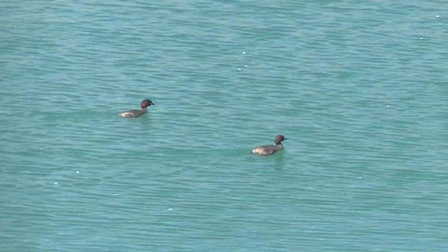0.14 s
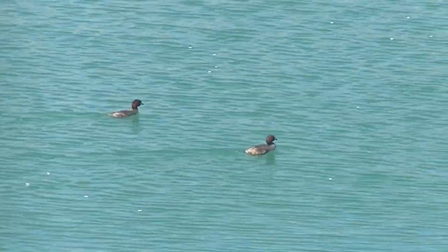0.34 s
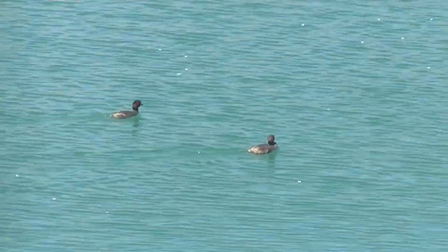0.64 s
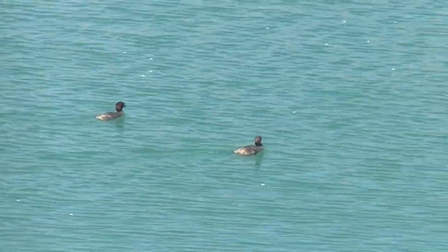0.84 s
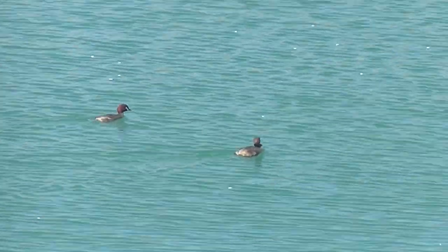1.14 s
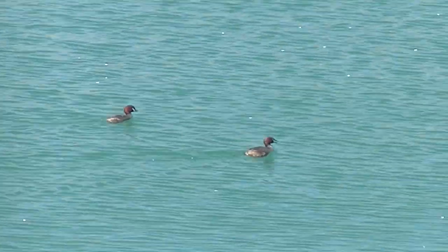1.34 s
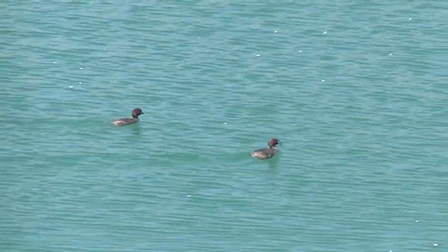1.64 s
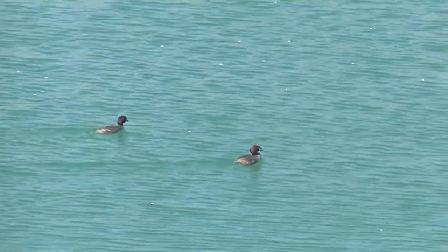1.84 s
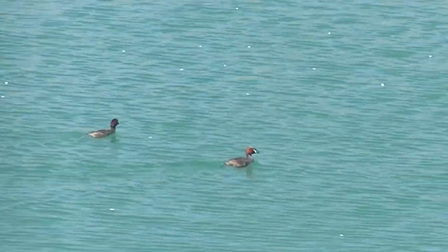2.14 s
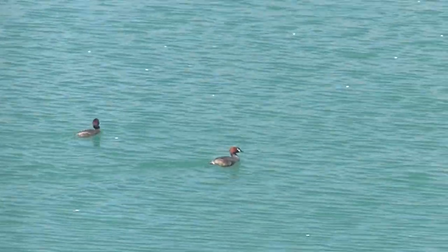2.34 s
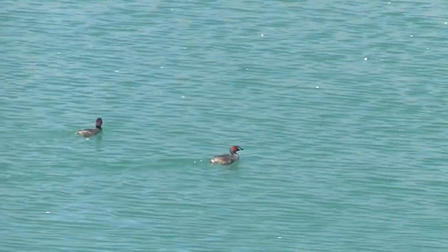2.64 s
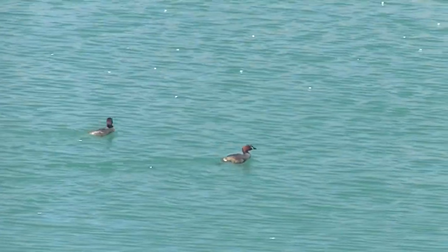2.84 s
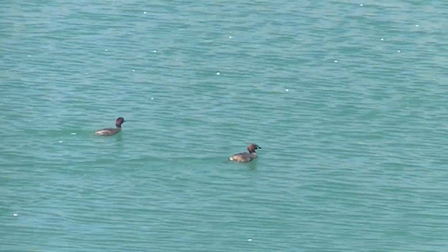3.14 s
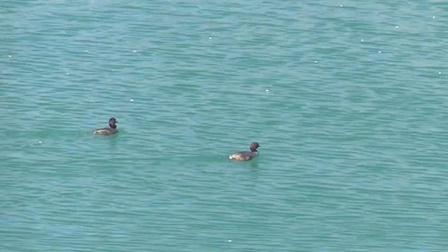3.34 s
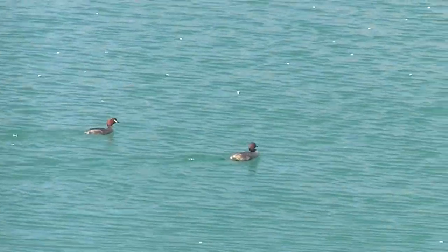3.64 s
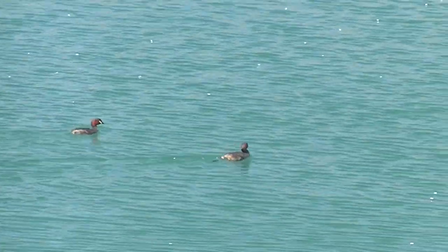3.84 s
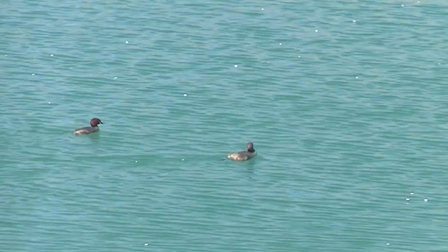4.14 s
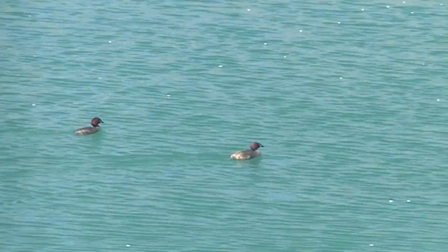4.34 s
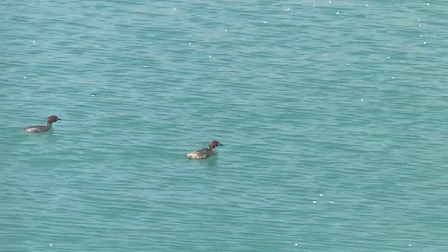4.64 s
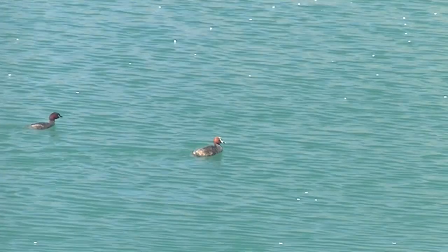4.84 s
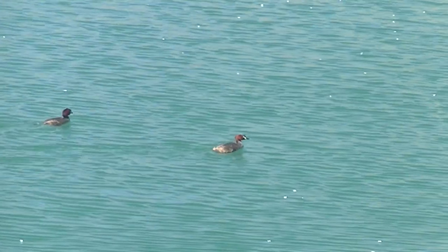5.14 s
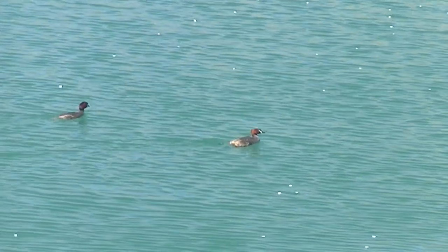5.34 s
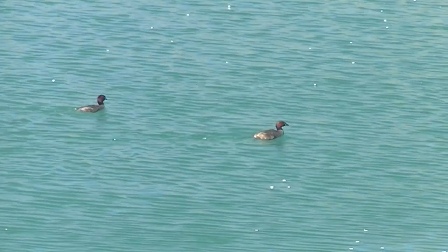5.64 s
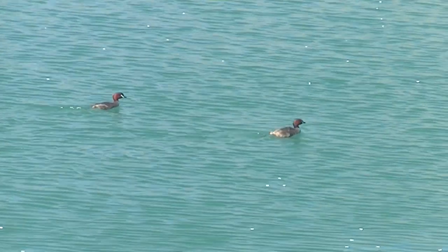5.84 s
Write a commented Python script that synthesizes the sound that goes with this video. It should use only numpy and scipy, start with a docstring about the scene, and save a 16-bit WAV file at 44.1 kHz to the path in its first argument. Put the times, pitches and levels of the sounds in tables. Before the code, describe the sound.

A soft, steady outdoor hush with a fine hiss lasts the whole six seconds, fairly even and slightly wide. Very faint bumps may be heard near 0.3 s. At about 0.65 s a tiny peep leads into a rapid, high whinnying trill by little grebes on the water. Short arched, reedy notes alternate with purer rising ones, each kind about fifteen times a second, making a bubbling chatter around 2.5 to 4 kHz. It swells by 1 s, stays strong to about 2 s, slows slightly and fades with soft peeps by 2.5 s, trailing a faint wash from the banks. Then mostly hiss: faint distant chirps around 3.8 s, weak bumps near the microphone around 4.3 to 4.4 s, one crisp small tap at 4.5 s, a barely audible chirp at 4.9 s, and another thin double chirp near 5.7 s.

```python
"""Little grebes trilling on a pond

Arched and rising notes of about 25 ms alternate, each kind about 15 times a second, with soft peeps around.
Each note is a harmonic whistle carried by partials 2 and 3; water smears it and the banks return a faint wash.
Around it: steady hush and hiss (shaped noise), distant chirps (gliding sines), small knocks (decaying modes)."""
import sys
import numpy as np
from scipy import signal
from scipy.fft import rfft, irfft, next_fast_len
from scipy.io import wavfile
from scipy.ndimage import map_coordinates

SR = 44100
rng = np.random.default_rng(int(sys.argv[2]) if len(sys.argv) > 2 else 0)


def transcribe(signal):
    """Save signal, clipped to [-1, 1], as a 16-bit WAV file at the path in sys.argv[1]."""
    frames = np.atleast_2d(signal).T
    limited = np.clip(frames, -1, 1)
    pcm = np.round(limited * 32767).astype(np.int16)
    wavfile.write(sys.argv[1], SR, pcm)


N = 265041


def amp(db):
    """Decibels to gain."""
    return 10 ** (np.asarray(db) / 20)


def unit(x):
    """Scaled to rms 1."""
    return x / np.sqrt(np.mean(x ** 2) + 1e-20)


def along(points, hz):
    """(Hz, value) points interpolated on a log-frequency axis."""
    f, v = np.transpose(points)
    return np.interp(np.log(hz + 1), np.log(f + 1), v)


def wobble(rate_hz, size):
    """Smooth random curve with rate_hz knots a second."""
    knots = rng.standard_normal(4096)
    return map_coordinates(knots, [np.arange(size) * rate_hz / SR], mode="wrap")


def filtered(x, response):
    """x times a response of frequency."""
    m = next_fast_len(N + SR // 2)
    return irfft(rfft(x, m) * response(np.fft.rfftfreq(m, 1 / SR)), m)[..., :N]


def noise(spectrum):
    """Coloured noise of rms 1."""
    return unit(filtered(rng.standard_normal(N), lambda hz: amp(along(spectrum, hz))))


def add(track, start_s, sound):
    """Mix a sound into the track at start_s."""
    part = track[round(start_s * SR):][:len(sound)]
    part += sound[:len(part)]


def swell(u, attack, release):
    """Smooth rise and fall over u = 0 to 1; attack and release are shares of it."""
    rise = np.sin(np.pi / 2 * np.clip(u / attack, 0, 1)) ** 2
    fall = np.sin(np.pi / 2 * np.clip((1 - u) / release, 0, 1)) ** 2
    return rise * fall


# slow course of each voice: t/s, f/Hz, length/s, partial 2 level/dB before voice gain, partial 3 re 2/dB
ARCHED_COURSE = [(0.736, 1046, 0.018, -55.5, 1.5), (0.871, 1242, 0.022, -46.5, 1),
                 (0.995, 1290, .028, -41.5, -4.5), (1.122, 1242, 0.028, -41, 0),
                 (1.26, 1280, 0.029, -43, 3), (1.385, 1346, 0.024, -43.5, 10.5),
                 (1.458, 1234, 0.021, -46, 8), (1.651, 1208, .024, -46, 6), (1.72, 1245, .025, -40.5, -7.5),
                 (1.989, 1198, 0.02, -44, 1), (2.13, 1073, 0.017, -56, 3), (2.254, 1350, .017, -55, 0)]
RISING_COURSE = [(.76, 1307, .021, -54, -6), (.83, 1334, 0.022, -47.5, 3), (1.05, 1472, 0.031, -39, -4),
                 (1.25, 1556, 0.025, -41, -5.5), (1.41, 1555, 0.03, -38.5, -7.5),
                 (1.601, 1441, 0.028, -36.5, -13), (1.885, 1453, .021, -36.5, -14.5),
                 (2.017, 1420, 0.019, -34, -20), (2.087, 1323, 0.026, -43.5, -5),
                 (2.3, 1248, .023, -43.5, -6.5), (2.38, 1138, 0.02, -52.5, -2.5)]
# rising notes: t/s, pitch change/share of pitch, accent (0-1; above 0.5 = louder late)
RISING_SHAPE_COURSE = [(.8, .06, 0.53), (1.0, 0.041, .36), (1.45, 0.066, 0.29), (2.0, 0.034, 0.6),
                       (2.3, -0.011, 0.46)]
# soft upward peeps before and after the trill: t/s, partial 2 level/dB before voice gain
PEEP_EVENTS = [(.652, -56.5), (2.44, -56.5), (2.518, -55.5)]
PEEP_S, PEEP_HZ, PEEP_RISE, PEEP_THIRD_DB = 0.028, 1366, 0.205, -8
ARCHED_RISE, ARCHED_ACCENT = -0.022, 0.49  # pitch change/share, accent
ANSWER_SHARE = .44  # rising note's lag/period
EDGE_DB = -15.5  # lead-in and tail re body


def grebes():
    """Reedy arched notes on the beat interlock with purer rising ones between the beats."""
    on_beat, off_beat = beats(0, count=24), beats(ANSWER_SHARE, count=25)
    arched_notes = phrase(on_beat, ARCHED_COURSE, ARCHED_RISE, ARCHED_ACCENT)
    shape_s, rise, accent = np.transpose(RISING_SHAPE_COURSE)
    rise_now, accent_now = np.interp(off_beat, shape_s, rise), np.interp(off_beat, shape_s, accent)
    rising_notes = phrase(off_beat, RISING_COURSE, rise_now, accent_now)
    peeps = [(s, PEEP_S, PEEP_HZ, PEEP_RISE, .5, db, db + PEEP_THIRD_DB) for s, db in PEEP_EVENTS]
    arched = notes(arched_notes, arch=0.222, scoop=0.1555, sag=0.164, attack=0.29, release=0.37,
                   edge_db=EDGE_DB, jitter=0.0048, flutter_db=0.7,
                   first_db=-16, fourth_db=-12.0, fifth_db=-16, upper_db=-40)
    rising = notes(rising_notes + peeps, arch=0.156, scoop=0.1473, sag=0.012, attack=0.21, release=0.45,
                   edge_db=EDGE_DB, jitter=0.0042, flutter_db=1.0,
                   first_db=-24.5, fourth_db=-26.0, fifth_db=-26, upper_db=-44)
    voices = amp(-0.75) * arched + amp(0.4) * rising
    return voices + ripples(voices, db=-16, t60_s=.05)


FIRST_NOTE_S = .731  # centre of the first arched note
# shortest period, beat index that has it, period growth per squared beat before and after
PERIOD_S, FASTEST_BEAT, HURRY_S, TIRE_S = .065, 10.52, 2.94e-5, 5.33e-5


def beats(share, count):
    """Times at a share of each period: the trill hurries a little, then slows as the bird tires."""
    k = np.arange(count) - FASTEST_BEAT
    period_s = PERIOD_S + np.where(k < 0, HURRY_S, TIRE_S) * k ** 2
    return FIRST_NOTE_S + np.cumsum(period_s) - (1 - share) * period_s


PITCH_SPREAD, RISE_SPREAD = .006, .025  # standard deviation from note to note, shares of pitch


def phrase(times, course, rise, accent):
    """A note centred on each time, with the pitch, length and strength that the voice has then."""
    s, *controls = np.transpose(course)
    hz, length, db, third_db = (np.interp(times, s, c) for c in controls)
    detune, bend = (rng.standard_normal((len(times), 2)) * [PITCH_SPREAD, RISE_SPREAD]).T
    start_s = times - length / 2
    return list(np.broadcast(start_s, length, hz * (1 + detune), rise + bend, accent, db, db + third_db))


# roughness of the voices: t/s, rasp re mean of partials 2 and 3/dB
RASP_COURSE = [(.7, -9), (1.0, -11), (1.2, -7), (1.4, -4), (1.55, -7), (1.8, -8), (2.1, -8), (2.5, -4)]


def notes(table, arch, scoop, sag, attack, release, edge_db, jitter, flutter_db,
          first_db, fourth_db, fifth_db, upper_db):
    """One puff of air per note: the pitch scoops up, arches and sags; the weak ends are unsteady."""
    out = np.zeros(N)
    rasp_s, rasp_db = np.transpose(RASP_COURSE)
    margin = .2  # lead-in and tail, share of length
    for s, length, hz, rise, accent, second_db, third_db in table:
        size = int((1 + 2 * margin) * length * SR)
        u = np.linspace(-margin, 1 + margin, size)
        sounding = swell(np.linspace(0, 1, size), 0.12, 0.11)
        core = swell(u, attack, release)
        # the membrane already sounds faintly just before and after the puff
        tilt = np.exp(9 * (accent - .5) * np.clip(u - .5, -.3, .3))
        pressure = unit((core + amp(edge_db) * sounding) * tilt)

        glide = rise * (u - .5) - arch * (u - .5) ** 2
        glide -= scoop / (1 + np.exp(18 * u)) + sag / (1 + np.exp(18 * (1 - u)))
        unsteady = jitter * (1 + 5 * (1 - core)) * wobble(715, size)
        pitch = hz * (1 + glide + unsteady)
        phase = 2 * np.pi * np.cumsum(pitch) / SR

        effort_db = (second_db + third_db) / 2
        partials_db = [effort_db + first_db, second_db, third_db, effort_db + fourth_db, effort_db + fifth_db]
        partials_db += [effort_db + upper_db] * 6
        tone = np.zeros(size)
        for k, db in enumerate(partials_db, 1):
            flutter = amp(flutter_db * (k - 2) * wobble(273, size))
            tone += amp(db) * unit(pressure * throat(k * pitch) * flutter * np.sin(k * phase))

        # uneven cycles: noise-modulated tone midway between partials 2 and 3
        rasp = unit(wobble(1986, size) * np.sin(5 * phase / 2))
        rasp *= swell(u, 0.03, 0.036) * (1 - 0.079 * core)
        rasp_gain = amp(effort_db + np.interp(s, rasp_s, rasp_db))
        add(out, s - margin * length, tone + rasp_gain * rasp)
    return out


# resonances of windpipe and bill: f/Hz, width/Hz, relative level/dB
THROAT_MODES = [(2380, 190, 6), (3010, 300, 10), (3880, 1200, -17), (4510, 150, 4)]


def throat(hz):
    """Gain of the windpipe and bill: a partial flares as it glides through a resonance."""
    power = sum(amp(db) ** 2 / (1 + (2 * (hz - centre) / width) ** 2) for centre, width, db in THROAT_MODES)
    return np.sqrt(power)


def ripples(x, db, t60_s):
    """The moving water scatters a short smear after each note, different from moment to moment."""
    t = np.arange(SR // 20) / SR
    out = np.zeros(N)
    for path in rng.standard_normal((3, len(t))) * amp(-60 * t / t60_s):
        out += wobble(11.0, N) * signal.fftconvolve(x, path / np.linalg.norm(path))[:N]
    return amp(db) * out / np.sqrt(3)


# decay of the wash: f/Hz, t60/s
BANK_DECAY = [(500, 0.45), (3000, 0.72), (8000, 0.34)]


def banks(x):
    """Diffuse wash from the shore, different in each channel: decaying noise, longest near 3 kHz."""
    hz, t, z = signal.stft(rng.standard_normal((2, SR // 2)), SR, nperseg=256)
    decay = amp(-60 * t / along(BANK_DECAY, hz)[:, None])
    a, b = signal.istft(z * decay, SR, nperseg=256)[1]
    tail = np.array([a + 0.54 * b, a - 0.11 * b])
    return signal.fftconvolve(x[None], tail / np.linalg.norm(tail[0]), axes=1)[:, :N]


# distant birds: t/s, length/s, start f/Hz, middle f/Hz, end f/Hz, level/dB, octave re fundamental/dB
CHIRP_EVENTS = [(3.82, 0.028, 2500, 2720, 2700, -46.5, -25), (3.835, 0.036, 3420, 3440, 3470, -48, -25),
                (3.872, 0.026, 3400, 3400, 3520, -57, -25), (4.875, .024, 2260, 2320, 2330, -56, -25),
                (5.651, 0.044, 3480, 3500, 3460, -46.5, -5), (5.681, 0.031, 3420, 3350, 3250, -47, -4.5)]


def chirps():
    """Short whistles from far away: a gliding sine and its octave, slightly unsteady."""
    out = np.zeros(N)
    for s, length, start_hz, middle_hz, end_hz, db, octave_db in CHIRP_EVENTS:
        u = np.linspace(0, 1, int(length * SR))
        pitch = np.polyval(np.polyfit([0, .5, 1], [start_hz, middle_hz, end_hz], 2), u)
        phase = 2 * np.pi * np.cumsum(pitch * (1 + 0.0063 * wobble(127, len(u)))) / SR
        level = amp(db + 2.4 * wobble(140, len(u))) * swell(u, .38, .35)
        add(out, s, level * (np.sin(phase) + amp(octave_db) * np.sin(2 * phase)))
    return out


# knocks near the microphone: t/s, relative level/dB, contact time/s
KNOCK_EVENTS = [(.28, -60, 0.0013), (.38, -61, 0.0017), (2.14, -53, 0.0014), (2.429, -55.5, 0.0017),
                (4.294, -62, 0.0019), (4.321, -61, 0.0027), (4.358, -54, 0.0024), (4.41, -55, .0014),
                (4.5332, -35.5, .0001)]
# modes of the small case that is knocked: f/Hz, relative level/dB, t60/s
CASE_MODES = [(206, -28.5, 0.065), (300, -10.5, 0.052), (496, 7, 0.017), (810, 9, 0.02),
              (1010, 12.5, 0.014), (1500, 1, 0.019)]


def knocks():
    """Soft bumps and one hard tap ring the case modes; a longer contact weakens the high modes."""
    out, t = np.zeros(N), np.arange(SR // 8) / SR
    # the small case radiates neither deep bass nor treble
    radiation = signal.butter(3, [160, 1750], "band", fs=SR, output="sos")
    for s, db, contact_s in KNOCK_EVENTS:
        ring = np.zeros(len(t))
        for hz, level_db, t60_s in CASE_MODES:
            mode = amp(level_db - 60 * t / t60_s) * np.cos(2 * np.pi * hz * t)
            ring += mode / (1 + (2 * hz * contact_s) ** 4)
        ring = signal.sosfilt(radiation, ring)
        add(out, s, amp(db + 6.0) * ring / np.abs(ring).max())
    return out


# noise spectra, breeze and hiss common to both channels, side opposed: f/Hz, relative level/dB
HUSH_SPECTRUM = [(24, -58), (40, -27.5), (97, -33), (172, -25.5), (329, -11), (541, -5), (579, -4.5),
                 (699, -3.5), (762, -1.5), (1360, -8), (1560, -5.5), (2400, -11), (3120, -20), (5280, -120)]
HISS_SPECTRUM = [(1290, -36), (2200, -8), (3270, -0.5), (4800, 0), (5450, -6), (7900, -9), (9950, -18),
                 (15200, -22), (15800, -31)]
SIDE_SPECTRUM = [(18, -47), (30, -11), (168, -11), (383, 0.5), (1040, 0.5), (1220, -1.5), (1610, -1.5),
                 (2770, -2), (4400, -9.5), (4880, -10.5), (6640, -13.5), (7360, -32), (8590, -22),
                 (9280, -30.5), (14000, -39)]
BREEZE_DB, HISS_DB, SIDE_DB = -55.5, -52.0, -60.5  # mean rms levels


def background():
    """Breeze on water and shore, its level drifting slightly, with mono microphone hiss and side noise."""
    hush = amp(BREEZE_DB + 0.16 * wobble(10, N)) * noise(HUSH_SPECTRUM)
    hiss = amp(HISS_DB) * noise(HISS_SPECTRUM)
    side = amp(SIDE_DB + 0.24 * wobble(2.93, N)) * noise(SIDE_SPECTRUM)
    return np.array([hush + hiss + side, hush + hiss - side])


def scene():
    """The birds on the water, the shore's answer, the knocks and the background."""
    trill, far = grebes(), chirps()
    # f/Hz, left minus right/dB
    lean = [(1300, 2.5), (2400, -1.2), (2900, -2.5), (3700, 1.1), (6000, 0.0)]
    direct = filtered(trill, lambda hz: amp(np.outer([.5, -.5], along(lean, hz))))
    wash = banks(amp(-14.0) * (trill + far))
    return direct + far + wash + knocks() + background()


TOP_HZ = 15790


def record(dry):
    """Band limit: nothing passes from TOP_HZ up."""
    return filtered(dry, lambda hz: hz < TOP_HZ)


dry = scene()
out = record(dry)
transcribe(out)
```